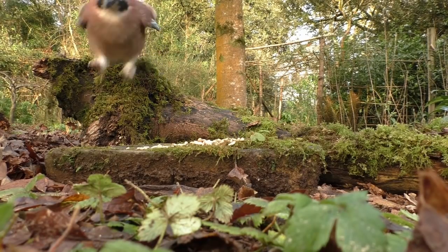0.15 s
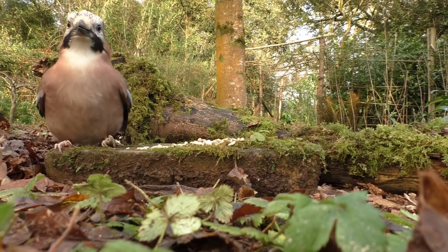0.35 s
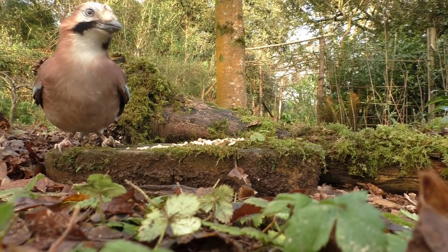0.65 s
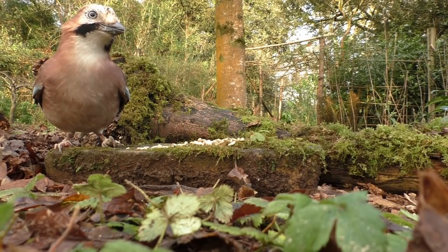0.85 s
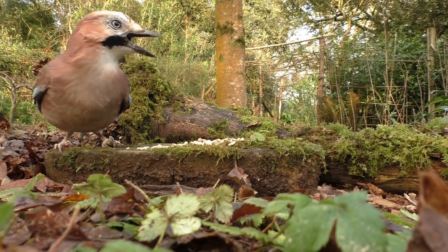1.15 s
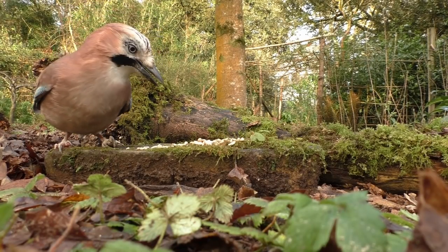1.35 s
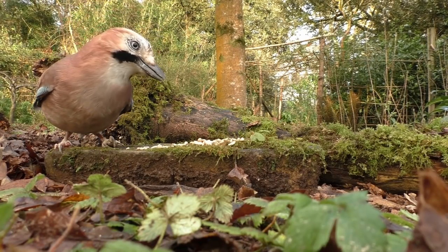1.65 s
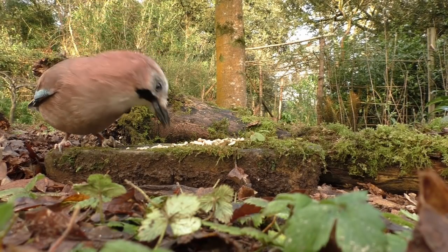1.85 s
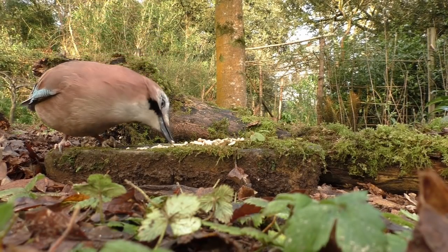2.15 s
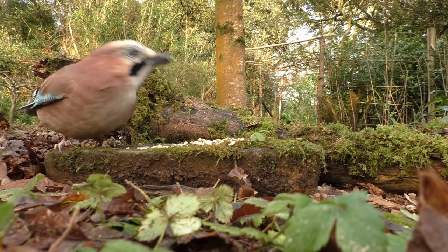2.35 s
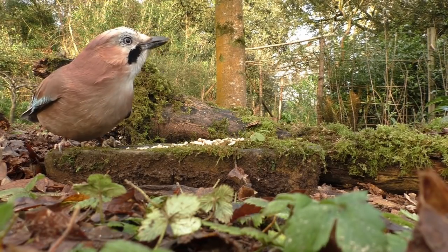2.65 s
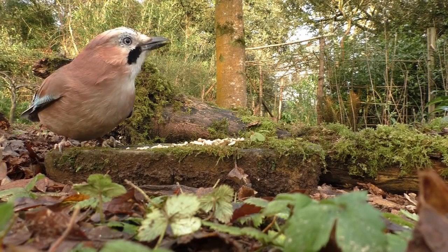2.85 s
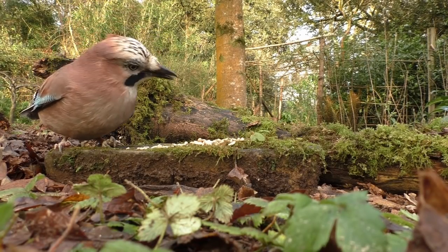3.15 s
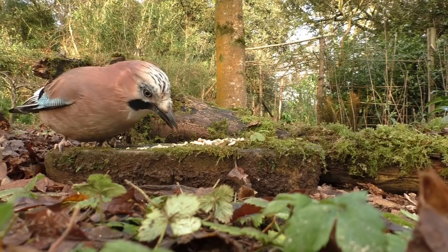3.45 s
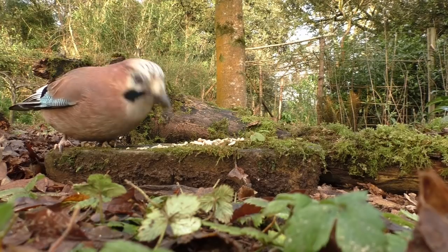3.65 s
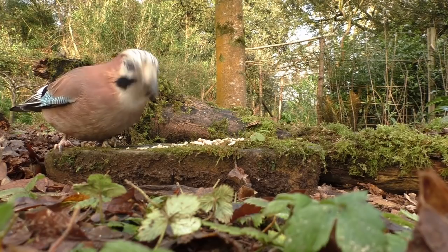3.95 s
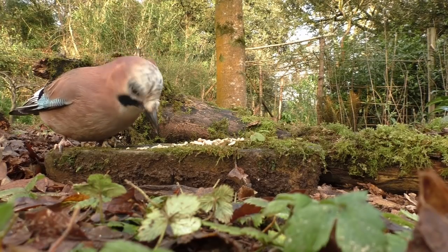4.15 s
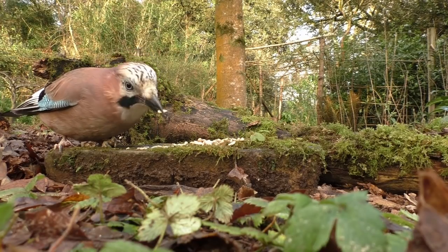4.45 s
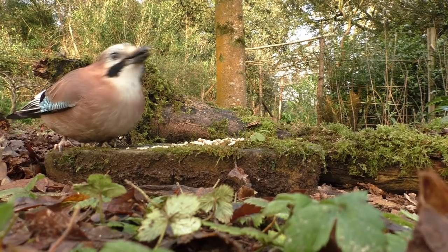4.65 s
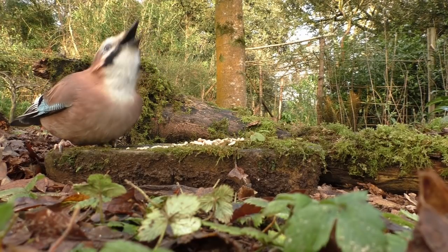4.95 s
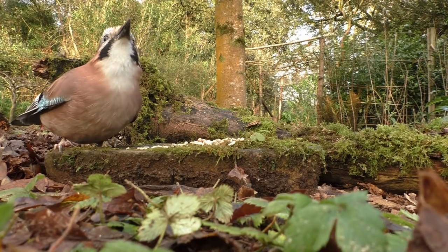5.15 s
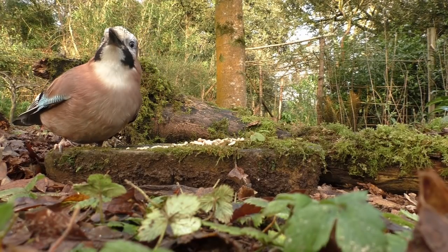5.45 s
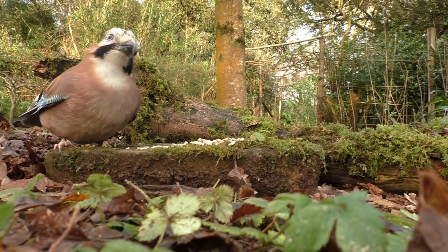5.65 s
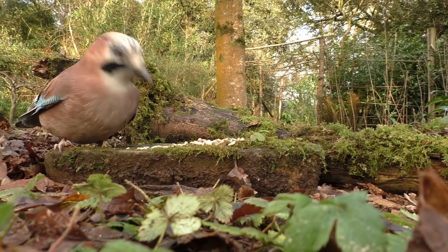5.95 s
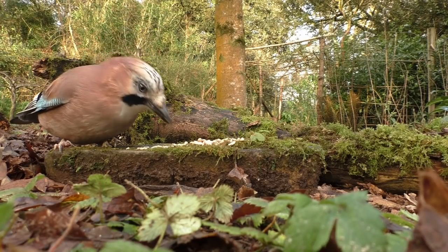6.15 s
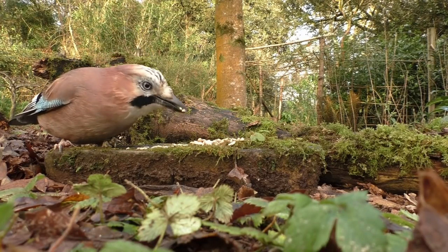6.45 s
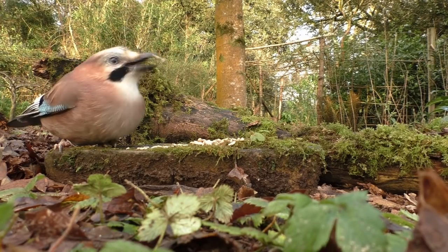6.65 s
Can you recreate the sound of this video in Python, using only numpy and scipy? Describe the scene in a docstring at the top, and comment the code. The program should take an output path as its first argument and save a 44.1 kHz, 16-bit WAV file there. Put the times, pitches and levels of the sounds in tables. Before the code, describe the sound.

Close to the microphone, a jay's claws tick on a damp log, then it gives a short, harsh screech. Two more rasping screeches follow a few seconds apart, with light beak taps at seed in between and at the end. Further off in the wood, small birds add thin high whistles, a couple of chirps and soft scolding churrs over a quiet, steady low rumble.

```python
"""A jay on a mossy feeding log, close to the microphone, gives three harsh screeches and pecks at seed.
Its flapping syrinx is the source, and the resonances of windpipe, mouth and beak are the filter;
each peck is an impact on damp wood. Small birds further off give thin whistles and two swooping chirps
(gliding tones) and scolding churrs (modulated noise). Trunks and leaves scatter the calls,
and far song and a low steady rumble fill the wood behind them."""
import sys
import numpy as np
from scipy import signal
from scipy.fft import rfft, irfft, next_fast_len
from scipy.io import wavfile
from scipy.ndimage import uniform_filter1d, map_coordinates

SR = 44100
rng = np.random.default_rng(int(sys.argv[2]) if len(sys.argv) > 2 else 0)


def transcribe(signal):
    """Save signal, clipped to [-1, 1], as a 16-bit WAV file at the path in sys.argv[1]."""
    frames = np.atleast_2d(signal).T
    limited = np.clip(frames, -1, 1)
    pcm = np.round(limited * 32767).astype(np.int16)
    wavfile.write(sys.argv[1], SR, pcm)


N = 300321

# thin whistles: start_s, length_s, first_hz, last_hz, level_db, upsweep_share
WHISTLE_NOTES = [(-.06, 0.16, 7500, 6770, -66, .3), (1.668, 0.019, 6730, 6220, -54, 0.092),
                 (1.824, 0.063, 7210, 7180, -49.5, 0.7), (2.402, 0.013, 7840, 7500, -53, 0.035),
                 (4.098, .078, 7000, 7010, -50.5, 0.68), (4.718, 0.11, 7390, 6850, -43.5, 0.19),
                 (4.902, 0.0804, 7230, 6950, -46.5, 0.28), (4.921, 0.088, 7170, 6725, -46, 0.74),
                 (5.077, 0.11, 7080, 6760, -48.5, 0.33), (6.068, 0.092, 7460, 7240, -53.5, 0.7)]
# spectral density of the background: frequency_hz, relative_db
RUMBLE_SPECTRUM = [(13, -56), (22, -14), (72, -1), (97, -4.5), (184, -6.5), (387, -10), (750, -25),
                   (1170, -18), (3150, -27), (4500, -32.5), (7000, -38), (7600, -38), (8970, -36),
                   (12100, -34), (16000, -35.5)]
# likeness of the background at left and right: frequency_hz, coherence
RUMBLE_COHERENCE = [(60, 0.3), (150, 0.48), (380, 0.051), (950, 0.05), (2380, 0.021), (5980, 0.66),
                    (15000, 0.44)]
# claws and beak on log and seed, and snaps of the beak: start_s, tick_peak_db, thud_re_tick_db
IMPACTS = [(.127, -36, -6.5), (.281, -27.5, -20), (0.2836, -30, 3), (.289, -43, 7), (.295, -41, 0),
           (.369, -38, -16), (.377, -40.5, -11), (1.312, -41, -29), (2.178, -45, 1), (3.123, -22.5, -26),
           (4.350, -36, -30), (4.368, -44, -20), (6.771, -33, -30), (6.7853, -30.5, -14), (6.796, -42, 2)]
# spectrum of the hard contact: frequency_hz, gain_db
TICK_SPECTRUM = [(500, -46), (2500, -5), (4800, -8), (7000, -9.5), (11000, -6.5), (16000, -15.5)]
# spectrum of the wood's response: frequency_hz, gain_db
THUD_SPECTRUM = [(80, 12.5), (350, -4), (700, -12), (1400, -8.5), (3000, -13), (8000, -55)]
# swooping chirps: start_s, time_to_flick_s, plunge_db, held_db, flick_db
CHIRP_NOTES = [(0.269, 0.05, -51, -57.5, -42), (3.773, .059, -51, -59.5, -50)]
# motion of syrinx and beak, a row per screech: opening_s, shutting_s, flap_hz, jitter_share,
# final_leak_share, open_mouth_hz, first_beak_hz, tone_hz, final_tone_db, first_hollow_db, last_hollow_db
SCREECH_GESTURES = [(0.1, 0.0117, 166, .03, .4, 890, 1880, 390, -7, -34.5, -50),
                    (0.056, .014, 146, .06, .68, 920, 2770, 446, -1.5, -41.5, -42),
                    (0.024, .021, 141, .06, 0.9, 884, 2920, 410, 4, -36, -41.5)]
# loudness and tuning, a curve per screech: time_s, voice_db, rasp_db, windpipe_hz
SCREECH_CURVES = [
    [(1.008, -43.5, -47, 1160), (1.016, -37.5, -49.5, 1115), (1.086, -27.5, -24.5, 1276),
     (1.102, -34, -22.5, 1250), (1.252, -35.5, -26.5, 1274), (1.306, -34.5, -34.5, 1290),
     (1.314, -40, -36.5, 1240), (1.328, -48, -68, 1270)],
    [(3.1, -44, -56, 1270), (3.12, -29, -42, 1250), (3.182, -31, -27.5, 1380), (3.224, -32.5, -30.5, 1420),
     (3.272, -31.5, -31.5, 1235), (3.324, -27, -30.5, 1330), (3.34, -31, -38, 1310),
     (3.362, -51, -63, 1260)],
    [(6.261, -39, -47, 1290), (6.281, -27, -39.5, 1306), (6.349, -27, -29, 1300), (6.371, -29, -33.5, 1300),
     (6.453, -26, -31, 1300), (6.501, -30.5, -35.5, 1270), (6.535, -43, -59, 1290), (6.543, -66, -73, 1300)],
]
# upper throat resonances, a set per screech: centre_hz, width_hz, gain_db
THROAT_FORMANTS = [
    [(1925, 440, -1.5), (2820, 480, 0), (3880, 1040, 0), (4520, 310, -6.5), (5940, 1570, -11.5),
     (9900, 1100, -20), (12630, 1000, -21.5)],
    [(2150, 470, 0.5), (3020, 570, 0.5), (3930, 1000, -3.5), (4700, 1100, -2.5), (6460, 1400, -10.5),
     (7460, 830, -12), (10500, 2000, -21.5), (14100, 900, -25)],
    [(1880, 1700, -2.5), (2390, 420, 0), (3180, 350, 1.5), (3860, 1050, -5.5), (4620, 740, -8.5),
     (6250, 1500, -12), (9400, 1200, -22.5), (11800, 3300, -30)],
]
# bouts of scolding: start_s, note_count, spacing_s, first_db, fade_db_per_s
CHURR_BOUTS = [(1.948, 4, 0.067, -59, 18), (3.369, 5, 0.061, -61, 8), (4.237, 4, .0668, -57.5, 18),
               (5.041, 6, .0686, -54.5, 17.5)]
# spectrum of a churr: frequency_hz, gain_db
CHURR_SPECTRUM = [(900, -28), (1700, -5.5), (2500, -11.5), (3700, -2.5), (5500, -11), (7500, -7.5),
                  (10500, -14.5), (15000, -31)]
# far song before scattering: start_s, length_s, first_hz, last_hz, level_db
FAR_NOTES = [(4.357, 0.079, 4010, 3730, -69), (4.478, 0.099, 3430, 3297, -65),
             (4.85, 0.22, 8100, 7800, -67.5), (5.027, .16, 7930, 7950, -66.5),
             (5.431, 0.038, 4380, 4970, -64), (5.485, 0.055, 3994, 3830, -66.5),
             (5.55, 0.029, 5740, 4830, -66.5), (5.609, 0.089, 3805, 3840, -66.5),
             (5.618, 0.095, 3220, 3230, -75), (5.781, 0.083, 3760, 3670, -69.5),
             (5.941, 0.067, 3130, 3040, -69), (6.559, 0.055, 3960, 3970, -73.5)]
# reverberation of the wood: frequency_hz, share_of_longest_decay
DECAY_SHARES = [(300, 0.25), (1500, 0.6), (3500, 1), (7500, 0.62), (15000, 0.9)]
# the jay's level at the two microphone ports: frequency_hz, left_minus_right_db
PORT_LEVELS = [(60, -2), (150, 0), (380, 2.5), (950, 2.5), (2380, 2.5), (5980, 0.6), (15000, 2.5)]
# its phase at the two ports: frequency_hz, left_lead_rad
PORT_LEADS = [(0, 0), (260, 0.67), (1290, -0.47), (1890, 0.79), (2330, -0.3), (14900, -0.2),
              (16300, -0.078)]


def from_db(db):
    """Amplitude grows tenfold for every 20 dB."""
    return 10 ** (np.asarray(db) / 20)


def rms_one(x):
    """Normalisation to unit mean power."""
    return x / np.sqrt(np.mean(x ** 2) + 1e-20)


def evened(x, size):
    """Division by the running rms over size samples holds the level at 1 but keeps fast pulses."""
    return x / np.sqrt(uniform_filter1d(uniform_filter1d(x ** 2, size), size) + 1e-12)


def at_hz(points, hz):
    """Interpolation of a spectrum on a log-frequency axis."""
    known_hz, values = np.transpose(points)
    return np.interp(np.log(np.maximum(hz, 1)), np.log(known_hz), values)


def bins(size):
    """Frequencies of a real Fourier transform."""
    return np.fft.rfftfreq(size, 1 / SR)


def drift(t, knots_per_s):
    """Smooth random fluctuation with a spread near 1."""
    knots = rng.standard_normal(1024)
    return map_coordinates(knots, [(t - t[0]) * knots_per_s], order=3, mode="wrap")


def fade(t, rise_s, fall_s):
    """An envelope with raised-cosine ends."""
    ramp = np.minimum((t - t[0]) / rise_s, (t[-1] - t) / fall_s)
    return np.sin(np.pi / 2 * np.clip(ramp, 0, 1)) ** 2


def phase_of(hz):
    """Phase is the integral of frequency."""
    return 2 * np.pi * np.cumsum(hz) / SR


def add(track, t, sound):
    """Superposition of a sound on a track from time t[0]."""
    at = round(t[0] * SR) + np.arange(len(sound))
    inside = (at >= 0) & (at < N)
    track[at[inside]] += sound[inside]


def shaped(x, gain_at, size=2048):
    """Folding the cepstrum gives a minimum-phase filter with the given gain curve."""
    cepstrum = irfft(np.log(gain_at(bins(size)) + 1e-6))
    cepstrum[1:size // 2] *= 2
    cepstrum[size // 2 + 1:] = 0
    return signal.fftconvolve(x, irfft(np.exp(rfft(cepstrum))))[:len(x)]


def coloured(x, spectrum):
    """Filtering imposes a tabulated spectral envelope."""
    return shaped(x, lambda hz: from_db(at_hz(spectrum, hz)))


def above(x, edge_hz):
    """A sixth-order high-pass filter."""
    return shaped(x, lambda hz: hz ** 6 / (hz ** 6 + float(edge_hz) ** 6))


def resonant(x, modes):
    """Stationary resonances (centre_hz, width_hz, gain_db), summed in power."""
    def gain_at(hz):
        peaks = [from_db(db) / (1 + ((hz - centre) / (0.54 * width)) ** 2) for centre, width, db in modes]
        return np.linalg.norm(peaks, axis=0)
    return shaped(x, gain_at)


def formant(x, hz, widths_hz, block=64):
    """Two-pole resonators in series make one gliding resonance, held at an even level."""
    x = x.copy()
    for width in widths_hz:
        radius, state = np.exp(-np.pi * width / SR), np.zeros(2)
        zeros = [1 - radius, 0, radius - 1]
        for i in range(0, len(x), block):
            poles = [1, -2 * radius * np.cos(2 * np.pi * hz[i] / SR), radius ** 2]
            x[i:i + block], state = signal.lfilter(zeros, poles, x[i:i + block], zi=state)
    return evened(x, 500)


def whistles(waver, flutter_db, octave_db=-23, attack_s=0.017):
    """Frequency modulation: near-pure tones sweep up, glide and end in a small downward hook."""
    out = np.zeros(N)
    for start, length, first_hz, last_hz, db, upsweep in WHISTLE_NOTES:
        age = np.arange(0, length, 1 / SR)
        glide_hz = first_hz + (last_hz - first_hz) * age / length
        sweep = 1 - upsweep * np.exp(-age / 0.0045)
        hook = 1 - 0.027 * np.exp((age - length) / 0.0018)
        phase = phase_of(glide_hz * sweep * hook * (1 + waver * drift(age, 266.4)))
        tone = np.sqrt(2) * (np.sin(phase) + from_db(octave_db) * np.sin(2 * phase))
        envelope = (1 - 0.81 * np.exp(-(age / attack_s) ** 2)) * fade(age, 0.0017, 0.008)
        add(out, start + age, tone * envelope * from_db(db + flutter_db * drift(age, 121)))
    return out


def rumble(level_db):
    """Partial coherence: far rumble and faint hiss are only partly alike at the two ears."""
    size = next_fast_len(N)
    hz = bins(size)
    coherence = at_hz(RUMBLE_COHERENCE, hz)
    mid, side = rfft(rng.standard_normal((2, size)))
    ears = np.sqrt(1 + coherence) * mid + np.sqrt(1 - coherence) * side * np.array([[1], [-1]])
    sound = irfft(ears * from_db(at_hz(RUMBLE_SPECTRUM, hz)), size)[:, :N]
    return from_db(level_db) * rms_one(sound)


def taps(tick_s, thud_s):
    """Impact excitation: each contact gives a dry tick and a quickly damped thud from the wood."""
    out, age = np.zeros(N), np.arange(2048) / SR
    for start, db, thud_db in IMPACTS:
        tick = coloured(rng.standard_normal(len(age)) * np.exp(-age / tick_s), TICK_SPECTRUM)
        thud = coloured(rng.standard_normal(len(age)) * np.exp(-age / thud_s), THUD_SPECTRUM)
        impact = tick / abs(tick).max() + from_db(thud_db) * thud / abs(thud).max()
        add(out, start + age, from_db(db) * impact)
    # the pecks carry little below 200 Hz
    return signal.sosfilt(signal.butter(2, 200, "high", fs=SR, output="sos"), out)


def chirps(top_hz=8200, low_hz=2174, rise_hz_per_s=7200, plunge_s=0.0085, flick_hz=850, flick_s=0.0085):
    """A frequency sweep: the pitch plunges, stays low under a fading octave, then flicks up twice."""
    out = np.zeros(N)
    for start, hold_s, plunge_db, held_db, flick_db in CHIRP_NOTES:
        age = np.arange(0, hold_s + 2 * flick_s, 1 / SR)
        plunge = np.exp(-(age / plunge_s) ** 2)
        flicks = np.maximum(age - hold_s, 0) / flick_s
        arch = np.sin(np.pi * flicks) ** 2
        hz = low_hz + (top_hz - low_hz) * plunge + rise_hz_per_s * age + flick_hz * arch
        phase = phase_of(hz * (1 + 0.0074 * drift(age, 483)))
        flick_gain = from_db(flick_db - 14 * (flicks > 1)) * np.sqrt(arch)   # the second is weaker
        gain = from_db(held_db) + from_db(plunge_db) * np.sin(np.pi * plunge) + flick_gain
        octave_gain = from_db(held_db + 1 - 130 * age) * (1 - plunge) * np.exp(-2 * flicks)
        tone = np.sqrt(2) * (gain * np.sin(phase) + octave_gain * np.sin(2 * phase))
        add(out, start + age, tone * fade(age, 0.0026, 0.002))
    return out


def syrinx(t, flap_hz, jitter, final_leak, first_leak=0.1, leak_grows_s=0.16, burst_s=0.0033):
    """A vibrating valve: each flap opens with a snap and passes a burst of air. Gives snaps and flow."""
    age = t - t[0]
    rate_hz = flap_hz * (1 + 0.14 * np.exp(-age / 0.06))   # starts fast, then settles
    # the valve closes ever less cleanly, and so flaps less evenly
    leak = first_leak + (final_leak - first_leak) * np.minimum(age / leak_grows_s, 1) ** 2
    cycles = np.cumsum(rate_hz * (1 + (jitter + 0.25 * leak ** 3) * drift(t, 170))) / SR
    flap, flap_age = cycles.astype(int), cycles % 1 / rate_hz
    strength = from_db(1.2 * rng.standard_normal(128)[flap])
    opens = np.diff(flap, prepend=-1) > 0
    flow = leak + (1 - leak) * np.exp(-(flap_age / burst_s) ** 4)
    return -strength * opens, strength * flow


def clear_tone(t, pitch_hz, windpipe_hz, mouth_hz):
    """Resonance selects the harmonics that lie near the windpipe or mouth frequency."""
    phase = phase_of(pitch_hz * (1 + 0.012 * drift(t, 250)))
    harmonic = np.arange(1, 6)[:, None]
    windpipe_gain = 1 / (1 + ((harmonic * pitch_hz - windpipe_hz) / 160) ** 2)
    mouth_gain = 0.21 / (1 + ((harmonic * pitch_hz - mouth_hz) / 150) ** 2)
    return evened(np.sum((windpipe_gain + mouth_gain) * np.sin(harmonic * phase), axis=0), 900)


def screech(curve, throat, gesture, gape_s=0.11, first_mouth_hz=690, open_beak_hz=3260):
    """Source and filter: the syrinx drives the vocal tract while the beak opens and snaps shut."""
    (opening_s, shutting_s, flap_hz, jitter, final_leak, open_mouth_hz, first_beak_hz,
     tone_hz, final_tone_db, first_hollow_db, last_hollow_db) = gesture
    times, *columns = np.transpose(curve)
    t = np.arange(times[0], times[-1], 1 / SR)
    age, remaining = t - t[0], t[-1] - t
    voice_db, rasp_db, windpipe_hz = [np.interp(t, times, column) for column in columns]
    # opening lifts the mouth and beak resonances; shutting lowers the mouth resonance and the tone
    gape = 1 - np.exp(-(age / gape_s) ** 2)
    shut = np.exp(-remaining / shutting_s)
    sink = 1 - 0.58 * shut
    mouth_hz = (first_mouth_hz + (open_mouth_hz - first_mouth_hz) * gape) * sink
    beak_hz = first_beak_hz + (open_beak_hz - first_beak_hz) * gape
    # snaps carry the low resonances, turbulence the high ones
    snaps, flow = syrinx(t, flap_hz, jitter, final_leak)
    throat_air, beak_air = flow * rng.standard_normal((2, len(t)))
    low_drive, high_drive = throat_air + 13.8 * snaps, throat_air + 4 * snaps

    windpipe = formant(low_drive, windpipe_hz, widths_hz=(192, 400))
    mouth = formant(low_drive, mouth_hz, widths_hz=(285, 650))
    tone_gain = from_db(final_tone_db - 60 * remaining)   # comes through towards the end
    tone = tone_gain * clear_tone(t, tone_hz * sink, windpipe_hz, mouth_hz)
    voice = evened(above(windpipe - from_db(-10) * mouth + tone, edge_hz=445), 600)

    beak = formant(beak_air, beak_hz, widths_hz=(700, 1200))
    beak_gain = from_db(-1.5 - 49 * abs(age - 0.069))   # most piercing part-way open
    treble = evened(above(resonant(high_drive, throat), edge_hz=1700), 500)
    treble_gain = 0.29 + 0.76 * np.clip(age / opening_s, 0, 1) ** 2   # the half-shut beak holds it back
    rasp = evened(beak_gain * beak + treble_gain * treble, 600)

    # at either end the nearly shut throat rings hollow
    hollow = evened(resonant(low_drive, [(390, 160, -4), (165, 45, -12.5)]), 500)
    onset_gain = from_db(first_hollow_db - 221 * age) * (1 - np.exp(-age / 0.0027))
    hollow_gain = onset_gain + from_db(last_hollow_db) * shut
    sound = from_db(voice_db) * voice + from_db(rasp_db) * rasp + hollow_gain * hollow
    return t, sound * fade(t, 0.00096, 0.0021)


def jay():
    """Articulation: three screeches, each with its own setting of syrinx, throat and beak."""
    out = np.zeros(N)
    for curve, throat, gesture in zip(SCREECH_CURVES, THROAT_FORMANTS, SCREECH_GESTURES):
        add(out, *screech(curve, throat, gesture))
    return out


def churrs(length_s, buzz_hz):
    """Amplitude modulation: a fast buzz chops breathy noise, in fading runs of short hoarse notes."""
    out = np.zeros(N)
    for start, count, spacing_s, db, fade_db_per_s in CHURR_BOUTS:
        for delay in spacing_s * np.arange(count):
            t = start + delay + np.arange(0, length_s, 1 / SR)
            buzz = 1 + 1.05 * np.sin(phase_of(buzz_hz * (1 + 0.075 * drift(t, 99))))
            note = rms_one(coloured(buzz * rng.standard_normal(len(t)), CHURR_SPECTRUM))
            add(out, t, from_db(db - fade_db_per_s * delay) * note * fade(t, 0.013, 0.011))
    return out


def far_song(warble):
    """Fast random frequency modulation makes gliding tones warble."""
    out = np.zeros(N)
    for start, length, first_hz, last_hz, db in FAR_NOTES:
        age = np.arange(0, length, 1 / SR)
        glide_hz = first_hz + (last_hz - first_hz) * age / length
        tone = np.sin(phase_of(glide_hz * (1 + warble * drift(age, 415))))
        add(out, start + age, from_db(db) * tone * fade(age, 0.0053, 0.018))
    return out


def in_wood(x, pan_db, echo_db, t60_s):
    """Reverberation: scatter from trunks and leaves follows the direct sound, decaying band by band."""
    age = np.arange(SR) / SR
    edges_hz = [200, 1000, 2500, 5500, 10000, 17000]
    scatter = 0
    for low, high in zip(edges_hz, edges_hz[1:]):
        bandpass = signal.butter(2, [low, high], "band", fs=SR, output="sos")
        band = signal.sosfilt(bandpass, rng.standard_normal((2, SR)))
        decay_s = t60_s * at_hz(DECAY_SHARES, np.sqrt(low * high))
        scatter = scatter + band * from_db(-60 * age / decay_s)
    mid, side = scatter * (1 - np.exp(-age / 0.0009))
    ears = (mid + 0.5 * side * np.array([[1], [-1]])) / np.linalg.norm(mid)
    echo = signal.fftconvolve(x[None], ears, axes=1)[:, :N]
    return (x + from_db(echo_db) * echo) * from_db([[pan_db / 2], [-pan_db / 2]])


def at_ports(x):
    """Near field: a close source reaches the two microphone ports with different level and phase."""
    size = next_fast_len(N + 4096)
    hz, sides = bins(size), np.array([[0.5], [-0.5]])
    response = from_db(sides * at_hz(PORT_LEVELS, hz)) * np.exp(1j * sides * at_hz(PORT_LEADS, hz))
    return irfft(rfft(x, size) * response, size)[:, :N]


def scene():
    """The ratio of reverberant to direct sound grows with distance: the near jay is almost dry."""
    near = at_ports(in_wood(jay(), pan_db=0, echo_db=-32.5, t60_s=0.51))
    pecks = in_wood(taps(tick_s=0.0007, thud_s=0.0018), pan_db=3.5, echo_db=-14, t60_s=0.21)
    thin = in_wood(whistles(waver=0.008, flutter_db=2.0), pan_db=0.5, echo_db=-8.5, t60_s=0.91)
    scold = in_wood(churrs(length_s=0.045, buzz_hz=419.3), pan_db=3.5, echo_db=-4.5, t60_s=0.4)
    swoops = in_wood(chirps(), pan_db=3.7, echo_db=-6, t60_s=0.49)
    far = in_wood(far_song(warble=0.023), pan_db=2.5, echo_db=5.5, t60_s=1.0)
    return near + pecks + thin + scold + swoops + far + rumble(level_db=-55.5)


def record(dry):
    """Band limiting: an elliptic low-pass filter cuts steeply above 15.9 kHz."""
    return signal.sosfilt(signal.ellip(10, 0.1, 80, 15900, fs=SR, output="sos"), dry)


dry = scene()
out = record(dry)
transcribe(out)
```